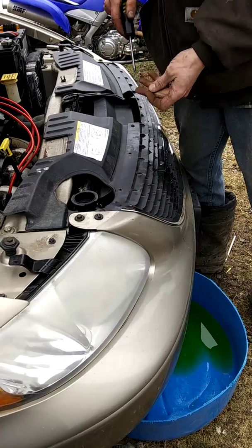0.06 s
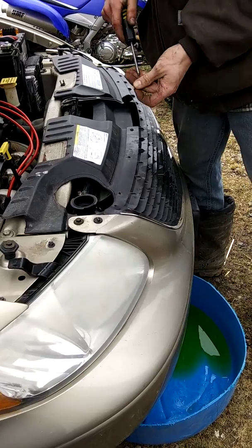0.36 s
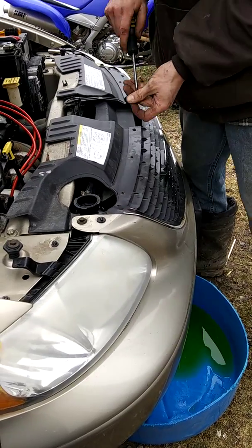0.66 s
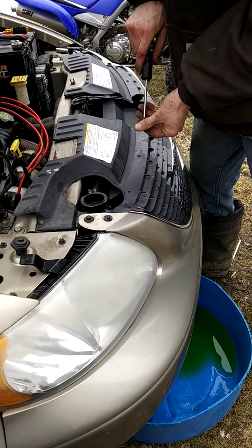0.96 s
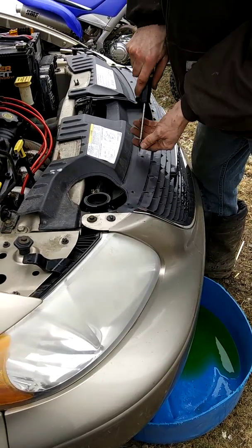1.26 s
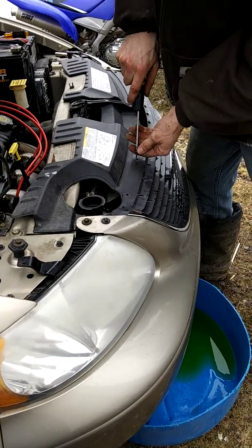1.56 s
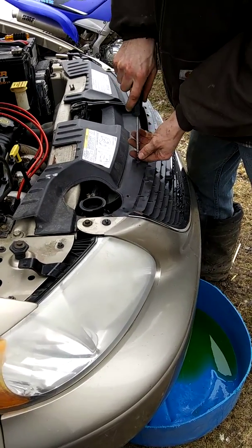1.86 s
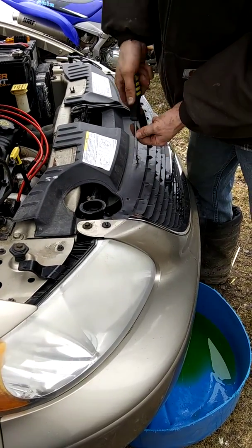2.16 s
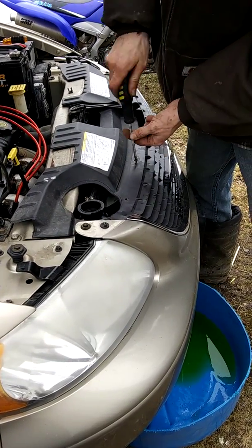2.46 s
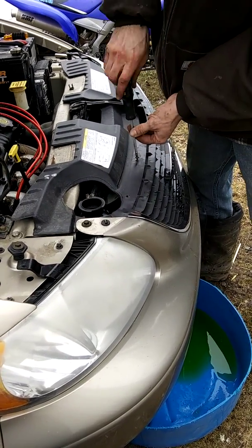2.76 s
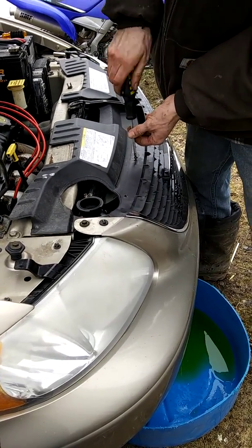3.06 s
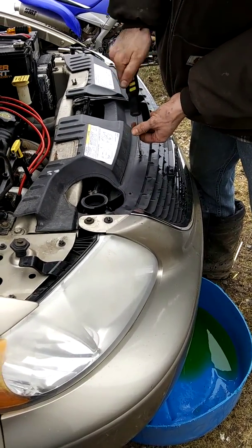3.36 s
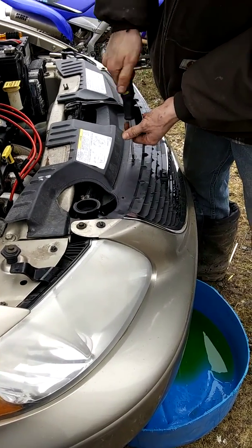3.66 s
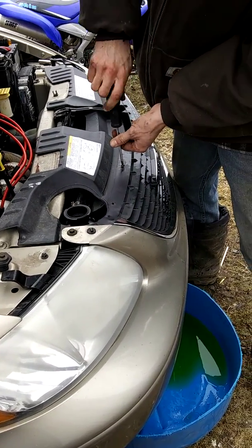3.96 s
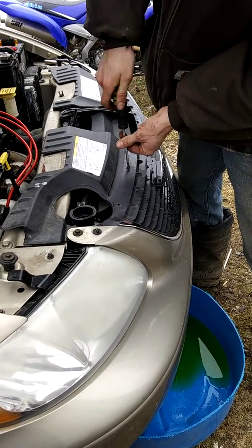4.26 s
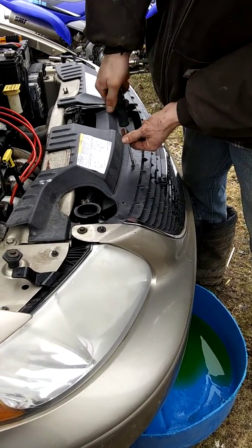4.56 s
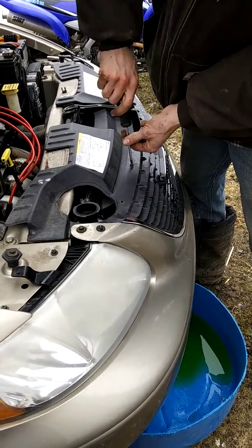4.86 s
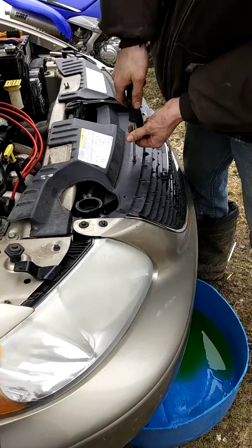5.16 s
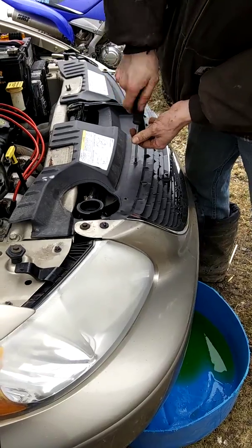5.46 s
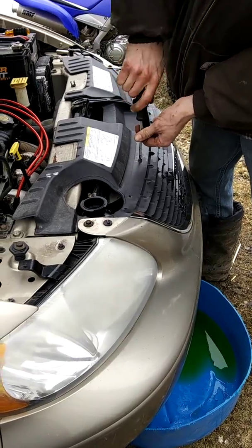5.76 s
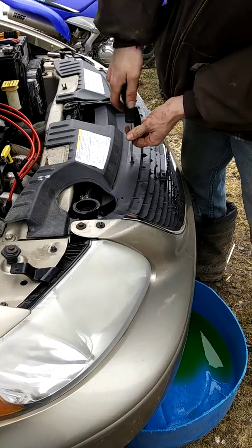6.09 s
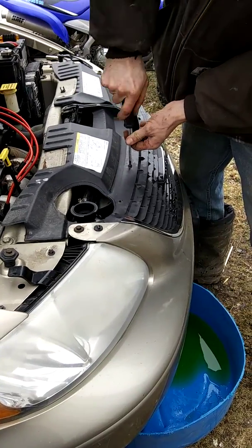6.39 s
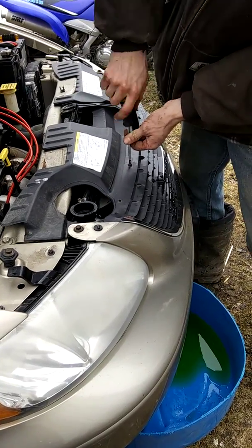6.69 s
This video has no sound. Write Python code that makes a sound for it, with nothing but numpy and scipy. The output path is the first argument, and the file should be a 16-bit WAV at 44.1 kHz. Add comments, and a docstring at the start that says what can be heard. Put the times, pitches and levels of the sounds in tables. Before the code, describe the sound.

Light irregular taps, ticks and scrapes of a screwdriver and hands on a car's plastic panel, with two sharper knocks near the end.

```python
"""A hand screwdriver works on screws in a parked car's plastic grille cover, over far traffic and
microphone hiss. First the hands bump the panel, taps excite the hollow cover's modes and the steel tip
ticks on a screw head. A stick-slip scrape follows; from 2 s a sleeve brushes with each twist of the wrist.
A thin far whine peaks near 3 s, then taps, scrapes and ticks come more often.
The hardest knocks fall last, near 6 s and 6.7 s."""
import sys
import numpy as np
from scipy import signal
from scipy.fft import rfft, irfft, next_fast_len
from scipy.io import wavfile
from scipy.ndimage import uniform_filter1d

SR = 44100
rng = np.random.default_rng(int(sys.argv[2]) if len(sys.argv) > 2 else 0)


def store_wav(level_fs):
    """Save 16-bit WAV to argv[1]."""
    pcm = np.round(np.clip(np.atleast_2d(level_fs), -1, 1) * 32767)
    wavfile.write(sys.argv[1], SR, pcm.T.astype(np.int16))


N = 301203
AGE = np.arange(int(.3 * SR)) / SR   # time since the start of one contact [s]


def from_db(db):
    """Amplitude ratio of a level: tenfold for each 20 dB."""
    return 10 ** (np.asarray(db) / 20)


def at_hz(points, hz):
    """Interpolation of a table on a logarithmic frequency axis."""
    points_hz, values = np.transpose(points)
    return np.interp(np.log(hz + 1e-9), np.log(points_hz), values)


def unit_rms(x):
    """Normalisation to a mean power of 1."""
    return x / np.sqrt(np.mean(x ** 2) + 1e-20)


def unit_burst(x):
    """Normalisation of a transient: its loudest 12 ms have a mean power of 1."""
    power = uniform_filter1d(x ** 2, int(.012 * SR), mode="constant")
    return x / np.sqrt(power.max() + 1e-20)


def band(x, hz, kind, order=2):
    """Causal Butterworth filtering, maximally flat in the passband."""
    return signal.sosfilt(signal.butter(order, hz, kind, fs=SR, output="sos"), x + 1e-18)


def resonance(x, hz, width):
    """One broad resonance, with half-power points at hz / width and hz * width."""
    return band(x, [hz / width, hz * width], "band", order=1)


def add(track, s, sound):
    """Superposition: a sound joins the track at s seconds."""
    start = int(s * SR)
    track[start:start + len(sound)] += sound[:N - start]


def noise(colour):
    """Spectral shaping of white noise: a stationary sound of rms 1."""
    size = next_fast_len(N)
    gain = from_db(at_hz(colour, np.arange(size // 2 + 1) * SR / size))
    return unit_rms(irfft(rfft(rng.standard_normal(size)) * gain, size)[:N])


def air_and_hiss(level_db=-63):
    """Stationary noise floor: outdoor air and the microphone's self-noise."""
    # spectrum of the floor: (frequency [Hz], relative density [dB])
    floor_colour = [(25, -42), (60, -27), (100, -16.5), (160, -6.5), (260, -2.5), (400, 1), (800, -4.5),
                    (1100, -7), (1500, -11), (2300, -14), (4600, -16.5), (7700, -29.5), (10500, -21.5),
                    (16000, -22.5)]
    return from_db(level_db) * noise(floor_colour)


def far_traffic(mean_db=-66, swing=2.07):
    """Amplitude-modulated noise: the wash of distant traffic swells and sinks."""
    # contour, widened by swing about its mean: (time [s], relative level [dB])
    contour = [(0.0, -66.5), (0.51, -63), (0.93, -63), (1.25, -60), (2.13, -65.5), (3.08, -62.5),
               (4.49, -64.5), (4.77, -62.5), (5.67, -65), (6.58, -60), (6.7, -66.5), (6.83, -64)]
    # spectrum of the wash: (frequency [Hz], relative density [dB])
    wash_colour = [(150, -29), (350, 4), (550, 4), (850, 7), (1100, 2), (1500, -19), (3000, -50)]
    swell_db = np.interp(np.arange(N) / SR, *np.transpose(contour))
    return from_db(mean_db + swing * (swell_db - swell_db.mean())) * noise(wash_colour)


def far_whine(hz=840, width_hz=14, peak_s=3.18, peak_db=-70.5, fade_db_per_s=5.5):
    """Narrow-band noise is heard as a pitch: a thin whine swells once and fades."""
    whine = unit_rms(band(rng.standard_normal(N), [hz - width_hz / 2, hz + width_hz / 2], "band"))
    return from_db(peak_db - fade_db_per_s * np.abs(np.arange(N) / SR - peak_s)) * whine


def sleeve(stroke_s=0.044, grain_db=4.0, gain_db=2.0):
    """Friction noise of cloth on cloth: a soft, grainy swell for each stroke of arm or wrist."""
    # shifts of the arm: (time [s], relative level [dB])
    swishes = [(0.43, -68.5), (0.65, -67), (1.8, -67.5), (3.64, -67), (3.87, -71), (6.72, -70)]
    # runs of wrist twists: (start [s], end [s], period [s], relative level [dB])
    twist_runs = [(2.049, 2.4, 0.24, -74), (2.535, 3.58, 0.19, -75.5), (4.167, 6.6, .194, -75)]
    # spectrum of the cloth: (frequency [Hz], relative density [dB])
    cloth_colour = [(700, -7), (2000, 5), (4200, 1.5), (5600, -2.5), (8000, -8), (10500, -2), (16000, -21)]
    t = np.arange(N) / SR
    twists = [(s, db) for start, end, period, db in twist_runs for s in np.arange(start, end, period)]
    strokes = sum(from_db(db) * np.exp(-np.minimum(np.abs(t - s) / stroke_s, 10) ** 2)
                  for s, db in swishes + twists)
    fibres = from_db(grain_db * unit_rms(band(rng.standard_normal(N), 250, "low")))
    return from_db(gain_db) * strokes * fibres * noise(cloth_colour)


def fumbling(per_s=35, level_db=-75.5):
    """A Poisson process: faint soft touches of the fingers come at random."""
    touches = (rng.random(N) < per_s / SR) * rng.uniform(-1.06, 1, N)
    return from_db(level_db) * unit_rms(band(touches, [150, 300], "band"))


def hand_bumps(rise_cycles=0.94, blur_db=-4.5, blur_s=0.0079):
    """Heavy damping: pushed softly, the held panel swings a few cycles, with little below its pitch."""
    # bumps of hands and handle: (time [s], level [dB], pitch [Hz])
    bumps = [(0.237, -53, 231), (0.425, -47, 215), (0.449, -45.5, 322), (0.542, -43.5, 323),
             (0.5663, -33, 590), (0.614, -46.5, 182), (0.634, -37.5, 306), (1.049, -61, 190),
             (1.523, -49.5, 220), (1.555, -39.5, 220), (1.832, -39.5, 337), (2.193, -55, 211),
             (2.257, -55.5, 248), (2.791, -55, 238), (4.468, -51.5, 210), (4.821, -53, 202),
             (5.426, -45, 313), (5.691, -55.5, 330), (5.78, -55, 196), (6.12, -52.5, 272),
             (6.491, -46, 199)]
    out = np.zeros(N)
    for s, db, hz in bumps:
        progress = AGE * hz / rise_cycles
        swing = progress ** 1.5 * np.exp(-1.5 * progress) * np.sin(2 * np.pi * hz * AGE)
        burst = rng.standard_normal(len(AGE)) * np.exp(-AGE / blur_s)
        blur = band(burst, [hz * 0.47, hz * 1.33], "band")
        bump = band(unit_burst(swing) + from_db(blur_db) * unit_burst(blur), hz * 0.5, "high", order=3)
        add(out, s, from_db(db) * unit_burst(bump))
    return out


def ring(modes, ring_share, scatter_db):
    """Modal superposition: each point of contact drives each damped mode with its own strength and sign."""
    hz, db, t60 = np.transpose(modes)[:, :, None]
    strength = from_db(db + scatter_db * rng.standard_normal(db.shape)) * rng.choice([-1, 1], db.shape)
    decay = from_db(-60 * AGE / (t60 * ring_share))
    return np.sum(strength * decay * np.sin(2 * np.pi * hz * AGE), axis=0)


def dense_ring(ring_share):
    """Modal overlap: the cover's many weak modes blur into noise that dies sooner in the treble."""
    # spectrum of the weak modes: (frequency [Hz], relative density [dB])
    colour = [(100, -17.5), (250, -4.5), (600, 9.5), (1000, -2.5), (1600, -22), (3000, -14.5), (4600, -6.5),
              (6000, -24), (9000, -27), (16000, -17)]
    # their decay: (frequency [Hz], free T60 [s])
    decay_times = [(200, 0.24), (800, 0.2), (2000, 0.13), (5000, 0.072), (16000, 0.051)]
    hz = np.arange(len(AGE) // 2 + 1) * SR / len(AGE)
    spectrum = rfft(rng.standard_normal(len(AGE))) * from_db(at_hz(colour, hz))
    out = np.zeros(len(AGE))
    for low_hz in 62.5 * 2.0 ** np.arange(8):
        octave = irfft(spectrum * ((hz >= low_hz) & (hz < 2 * low_hz)), len(AGE))
        t60 = ring_share * at_hz(decay_times, low_hz * np.sqrt(2))
        out += octave * from_db(-60 * AGE / t60)
    return out


def cover(ring_share, dense_db, crack_s=0.0061, crack_db=-10.5):
    """Impulse response of the cover: a crack radiated straight from the spot, then the modes."""
    # modes of cover and cavity: (frequency [Hz], relative level [dB], free T60 [s])
    cover_modes = [(222, -16, .15), (262, -19, .4), (298, -11, .17), (329, -2, .22), (380, -4, .2),
                   (402, -8, .18), (438, -12, .14), (515, -7, .17), (572, -8, .14), (645, -1, .12),
                   (700, -6, .14), (772, -8, .1), (861, -10, .11), (938, 0, .1), (966, -3, .11),
                   (1178, -14, .12), (1211, -8, .13), (1310, -6, .07), (1400, -12, .09), (1478, -6, .08),
                   (1630, -7, .06), (1820, -14, .06), (1936, -11, .07), (2123, -14, .06), (2660, -10, .05),
                   (2790, -8, .05), (3290, -16, .05), (3945, -9, .06), (4620, -15, .04)]
    burst = rng.standard_normal(len(AGE)) * np.exp(-AGE / crack_s)
    crack = band(band(burst, [450, 4200], "band"), 1260, "low", order=1)
    distinct = unit_burst(ring(cover_modes, ring_share, scatter_db=1.5))
    dense = unit_burst(dense_ring(ring_share))
    return distinct + from_db(dense_db) * dense + from_db(crack_db) * unit_burst(crack)


def slips(per_s, spread_db):
    """Stick-slip: two surfaces catch and release in tiny uneven impulses."""
    impulses = (rng.random(len(AGE)) < per_s / SR) * rng.choice([-1, 1], len(AGE))
    return impulses * from_db(spread_db * rng.standard_normal(len(AGE)))


def drive(force, response):
    """Linear response: the force is convolved with the body's impulse response."""
    return signal.fftconvolve(force, response)[:len(AGE)]


def contact(length_s, chatter_db):
    """Contact force: a first impulse, then chatter that swells and dies as the tool settles."""
    progress = AGE / length_s
    chatter = slips(per_s=3700, spread_db=3.0) * np.sqrt(progress) * np.exp(-progress ** 2)
    force = from_db(chatter_db) * chatter / (np.linalg.norm(chatter) + 1e-9)
    force[0] += np.exp(-length_s / 0.0058)   # a long contact starts gently
    return force


def tip_ticks(crack_s=0.0014, buzz_s=0.0042, buzz_db=-12.0, ring_share=0.88):
    """Hard impact: the tip rattles in the screw head, with a crack and a short ring of steel modes."""
    # ticks: (time [s], level [dB], pitch of the contact [Hz], ring relative to crack [dB])
    ticks = [(0.3439, -45.5, 5000, -14), (0.5673, -33.5, 3230, -4), (0.626, -62, 5000, -8),
             (0.671, -62.5, 4800, -10), (3.715, -57, 3800, -7), (3.738, -57, 2820, -2),
             (3.835, -55, 2960, -1), (4.45, -57, 3180, -4), (4.718, -50.5, 4000, -2),
             (6.001, -44, 3920, -1)]
    # modes of screwdriver and screw: (frequency [Hz], relative level [dB], free T60 [s])
    steel_modes = [(2800, -12, .025), (3150, -10, .02), (3360, 0, .035), (3790, -6, .045), (4380, -1, .03),
                   (4620, -6, .02), (4960, -9, .015), (5900, -7, .03), (6640, -12, .02), (7380, -11, .02),
                   (7990, -11, .018), (9180, -5, .018), (10100, -9, .02), (10700, -11, .018),
                   (13400, -14, .015)]
    out = np.zeros(N)
    for s, db, hz, ring_db in ticks:
        progress = 2 * AGE / crack_s
        envelope = progress * np.exp(1 - progress) + from_db(buzz_db) * np.exp(-AGE / buzz_s)
        crack = rng.standard_normal(len(AGE)) * envelope
        steel = drive(contact(.002, chatter_db=-4.0), ring(steel_modes, ring_share, scatter_db=1.0))
        tick = resonance(from_db(ring_db) * unit_burst(steel) + unit_burst(crack), hz, width=1.35)
        add(out, s, from_db(db) * unit_burst(band(tick, [2700, 10500], "band")))
    return out


def tip_scrapes(middle_hz=(330, 1100), treble_hz=1600, ring_share=0.55, gain_db=-3.5):
    """Friction drives the cover: the tip skids as pressure builds and eases, and also damps the modes."""
    # skids: (time [s], duration [s], relative middle level [dB], relative treble level [dB])
    scrapes = [(0.5, 0.026, -61, -56), (1.755, 0.067, -43.5, -60), (3.696, 0.047, -42, -46.5),
               (3.82, 0.019, -46.5, -47.5), (4.714, 0.022, -46.5, -53), (5.967, 0.017, -41, -38),
               (6.651, 0.008, -38.5, -53)]
    out = np.zeros(N)
    for s, length_s, middle_db, treble_db in scrapes:
        progress = np.minimum(AGE / length_s, 2)
        pressure = progress ** .3 * np.exp(-progress ** 6)
        rub = drive(slips(per_s=1400, spread_db=1.0) * pressure, cover(ring_share, dense_db=-3.5))
        add(out, s, from_db(middle_db) * unit_burst(band(rub, middle_hz, "band")))
        add(out, s, from_db(treble_db) * unit_burst(band(rub, treble_hz, "high", order=3)))
    return from_db(gain_db) * out


def cover_taps(low_hz=450, treble_hz=1300, clack_hz=2050, knock_db=-1.0, flex_rise_s=0.0089):
    """Impact excitation: the struck spot favours some modes; the panel's slow flexing builds up last."""
    # taps: (time [s], base level [dB], clack relative to base [dB], contact duration [s],
    #        share of the free ring time that the hand leaves [ratio], resonance of the spot [Hz])
    taps = [(0.423, -51.5, -7, 0.004, .2, 710), (0.447, -56.5, -2.5, 0.0018, 0.36, 730),
            (0.53, -50.5, -4, 0.0012, 0.57, 810), (0.566, -43.5, -3.5, 0.001, .33, 615),
            (1.423, -55, -8, 0.0053, 0.49, 820), (1.824, -39.5, -17, 0.0041, 0.97, 484),
            (3.048, -50.5, -26, 0.0055, .75, 750), (3.408, -52.5, -24, .003, 0.66, 620),
            (3.602, -36, -12.5, 0.0042, 0.71, 600), (3.699, -44.5, -25, 0.0085, .95, 580),
            (3.832, -33, -21, 0.007, 0.76, 560), (4.449, -45, -10.5, 0.00044, 0.68, 610),
            (4.547, -47.5, -18, 0.001, 0.52, 556), (4.739, -40.5, -13.5, 0.0013, 0.97, 690),
            (4.915, -47, -17.5, .006, 0.85, 675), (4.945, -52.5, -14.5, .003, .8, 700),
            (5.203, -51, -12, 0.0039, 0.92, 740), (5.39, -39, -16.5, 0.0046, 0.49, 640),
            (5.666, -47.5, -17.5, .007, 0.35, 620), (5.855, -47.5, -14.5, 0.007, 0.69, 746),
            (5.949, -49, -4.5, 0.0056, 1, 750), (5.984, -23.5, -10.5, 0.0023, 0.65, 840),
            (5.988, -26, -6, 0.0022, 0.94, 910), (6.315, -44, -15.5, 0.0044, 0.7, 816),
            (6.6636, -28, -6.5, 0.00085, 0.8, 895)]
    out = np.zeros(N)
    for s, db, clack_db, length_s, ring_share, spot_hz in taps:
        blow = drive(contact(length_s, chatter_db=0.0), cover(ring_share, dense_db=-0.5))
        bass = band(blow, low_hz, "low", order=4)
        middle = band(band(blow, low_hz, "high"), treble_hz, "low", order=3)
        treble = band(band(blow, treble_hz, "high", order=3), 11000, "low")
        flex = band(bass * (1 - np.exp(-AGE / flex_rise_s)), 230, "high", order=4)
        flex_db = -1.5 + np.log2(length_s / .004)   # 1 dB more for each doubling of the push's length
        knock = resonance(middle, spot_hz, width=1.27)
        clack = resonance(treble, clack_hz, width=1.65)
        for part, part_db in (flex, flex_db), (knock, knock_db), (clack, clack_db):
            add(out, s, from_db(db + part_db) * unit_burst(part))
    return out


def reflections(x, t60=0.35, dull_hz=1300, level_db=-28.0):
    """Diffuse reflection: the engine bay and the yard send back a weak, dull scatter."""
    envelope = from_db(-60 * AGE / t60) * (1 - np.exp(-AGE / 0.02))
    tail = band(rng.standard_normal(len(AGE)), dull_hz, "low") * envelope
    tail *= np.sqrt(2 * dull_hz / SR) / np.linalg.norm(tail)   # passband gain near 1
    return from_db(level_db) * signal.fftconvolve(x, tail)[:N]


def scene():
    """Superposition in open air: the close work, its reflections, the background and the sleeve."""
    work = cover_taps() + tip_scrapes() + tip_ticks() + hand_bumps() + fumbling()
    return (work + reflections(work) + far_traffic() + far_whine() + air_and_hiss() + sleeve())[None]


def record(dry, bass_hz=52, cutoff_hz=15900):
    """Band limiting by a small microphone: the bass is thinned and the top cut steeply."""
    thin = band(dry, bass_hz, "high", order=3)
    return signal.sosfilt(signal.ellip(10, .1, 70, cutoff_hz, fs=SR, output="sos"), thin)


dry = scene()
out = record(dry)
store_wav(out)
```